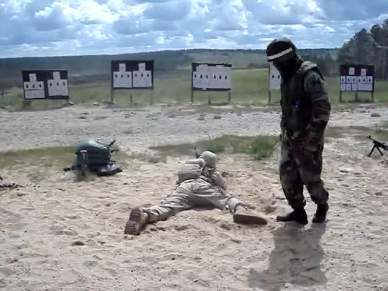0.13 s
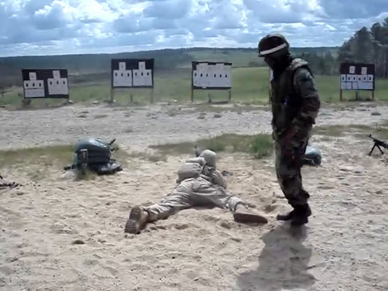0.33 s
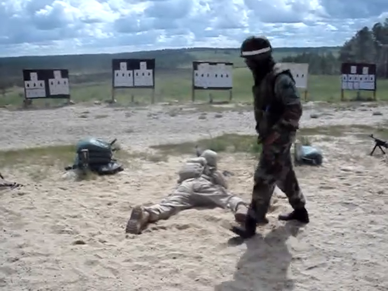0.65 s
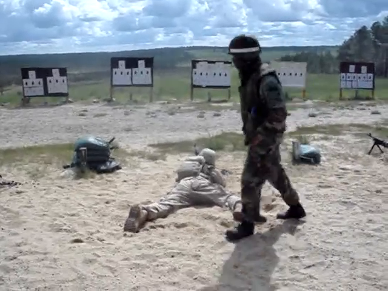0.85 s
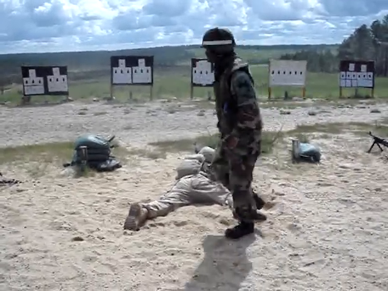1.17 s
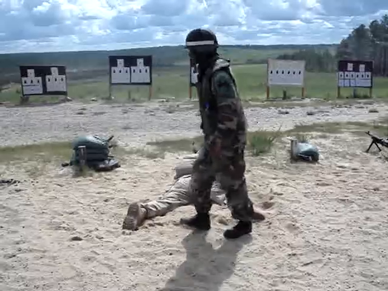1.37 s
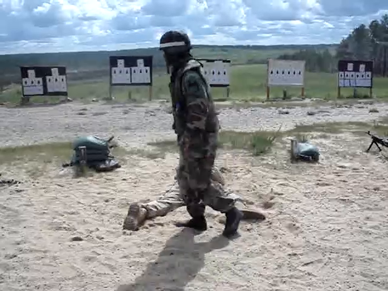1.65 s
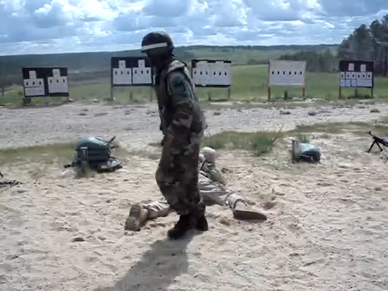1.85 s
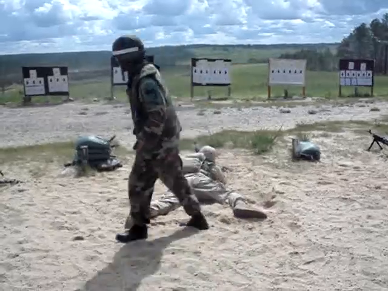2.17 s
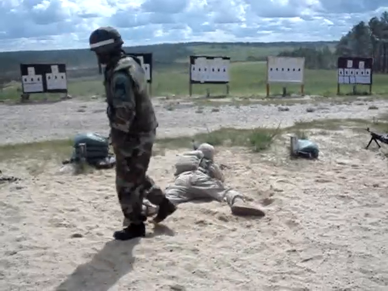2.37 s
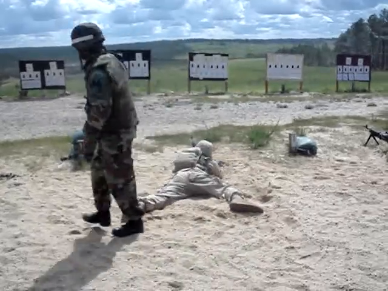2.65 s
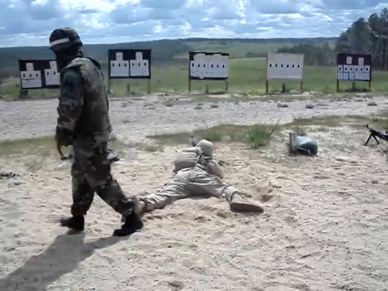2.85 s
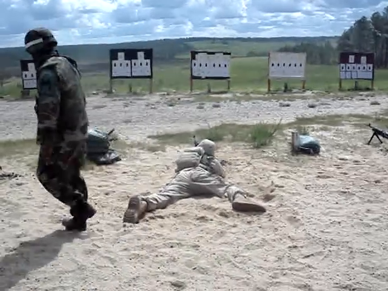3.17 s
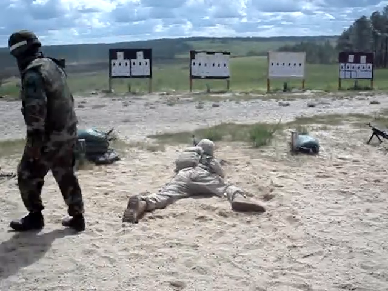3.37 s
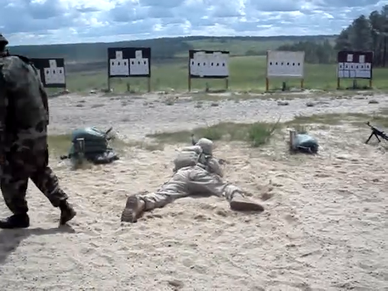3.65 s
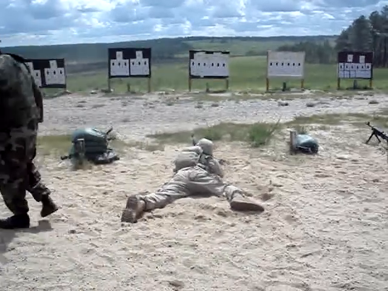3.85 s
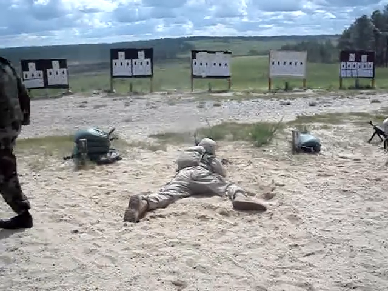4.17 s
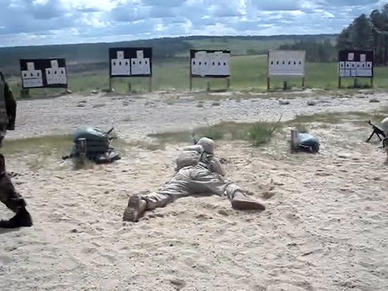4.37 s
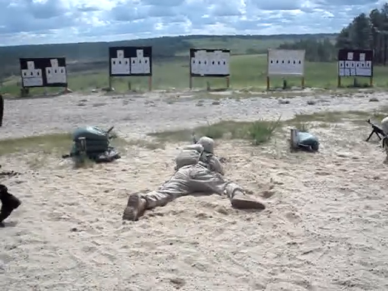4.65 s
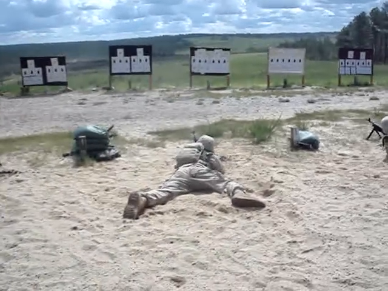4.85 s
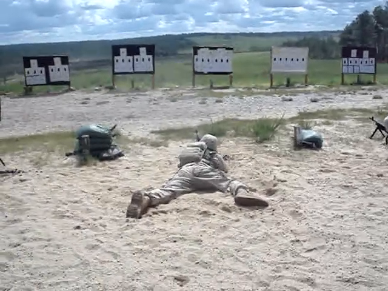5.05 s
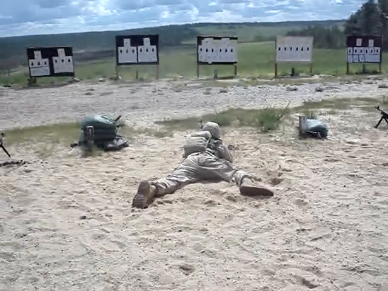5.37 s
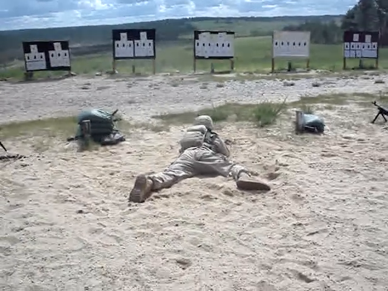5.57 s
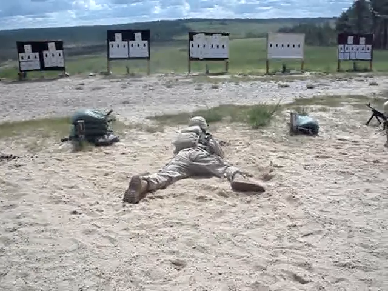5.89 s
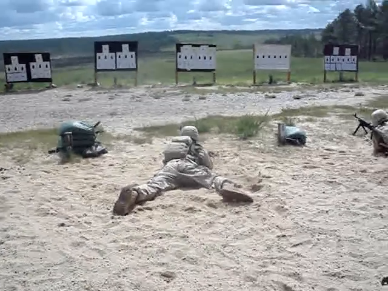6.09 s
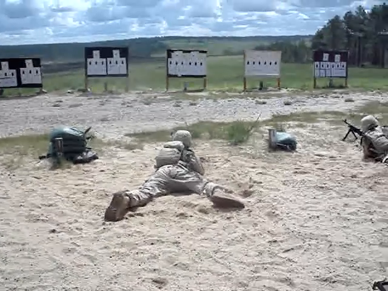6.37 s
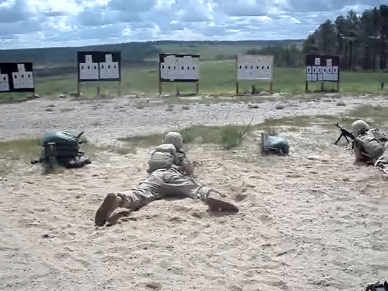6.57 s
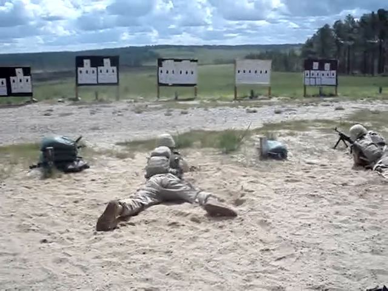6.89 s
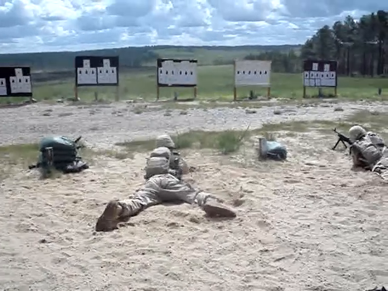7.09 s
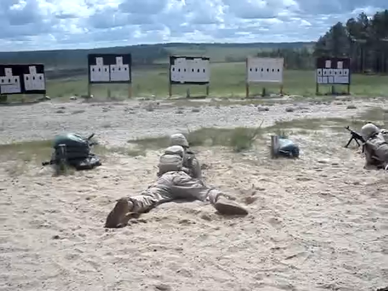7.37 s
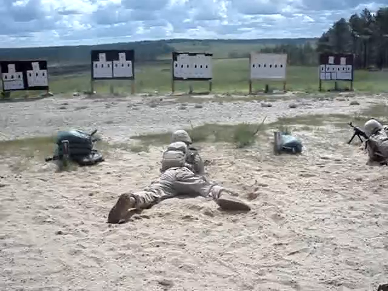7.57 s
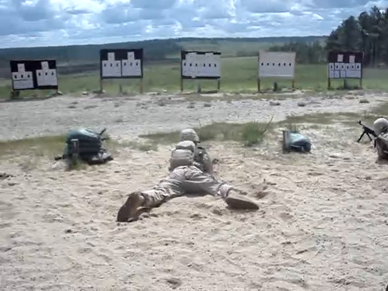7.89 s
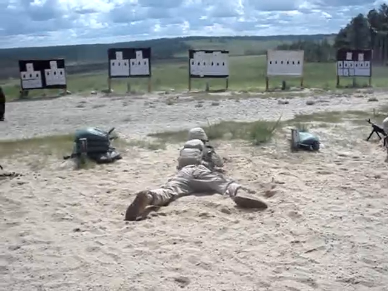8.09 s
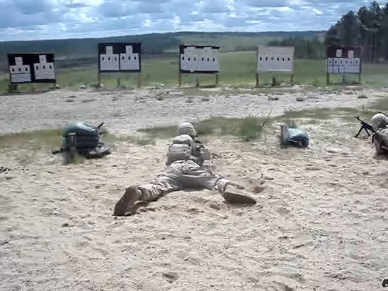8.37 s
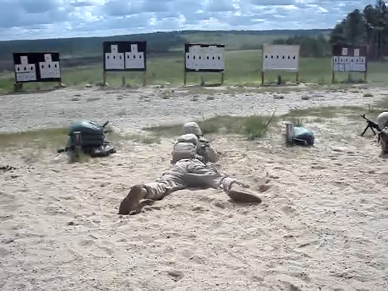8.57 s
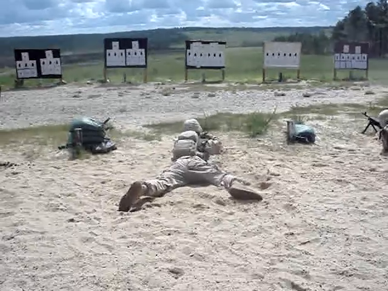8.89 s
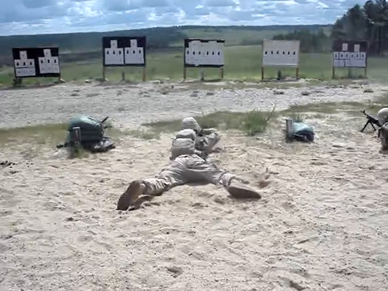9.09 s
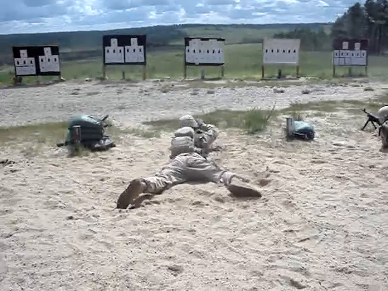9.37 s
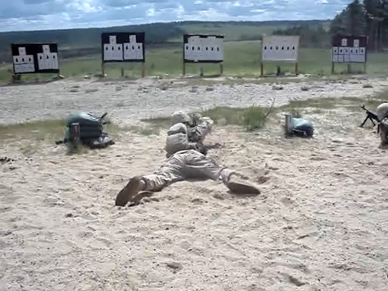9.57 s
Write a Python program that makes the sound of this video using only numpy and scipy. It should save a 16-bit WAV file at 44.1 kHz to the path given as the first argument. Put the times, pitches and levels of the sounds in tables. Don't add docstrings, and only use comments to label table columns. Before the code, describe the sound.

Machine guns rattle in short overlapping bursts on an open range, hollow claps returning from target boards, hills rumbling through the pauses.

```python
import sys
import numpy as np
from scipy import signal
from scipy.fft import rfft, irfft, next_fast_len
from scipy.io import wavfile
from scipy.ndimage import minimum_filter1d, map_coordinates

SR = 44100
rng = np.random.default_rng(int(sys.argv[2]) if len(sys.argv) > 2 else 0)


def master_out(mix):
    frames = np.transpose(np.atleast_2d(mix))
    ceiling = np.clip(frames, -1, 1)
    pcm = np.round(ceiling * 32767).astype(np.int16)
    wavfile.write(sys.argv[1], SR, pcm)


def undo_db(level):
    steps = np.asarray(level, float) / 20
    return 10 ** steps


N = 429527
LEAD, SPAN = 40, 1400


def along(points, hz):
    f, v = np.transpose(points)
    return np.interp(np.log(hz + 1), np.log(f + 1), v)


def coloured(shape, spectrum):
    m = next_fast_len(shape[-1])
    gain = undo_db(along(spectrum, np.fft.rfftfreq(m, 1 / SR)))
    x = irfft(rfft(rng.standard_normal(shape), m) * gain, m)[..., :shape[-1]]
    return x / np.sqrt(np.mean(x ** 2))


# (frequency [Hz], level [dB])
HILL_SPECTRUM = [(15, -61), (25, -8), (59, -44.5), (189, -12.5), (318, -3.5), (438, -6), (485, -8),
                 (616, -4.5), (1240, -3), (3000, -10), (3900, -52), (6600, -120)]
# (frequency [Hz], level [dB])
HISS_SPECTRUM = [(1760, -17.5), (3000, -19.5), (3250, -4), (4540, -6.5), (6510, -16.5), (10100, -27),
                 (13100, -51), (22000, -120)]
# (time [s], level [dB])
RUMBLE_LEVEL = [(0, -43.5), (.76, -43), (1.3, -43.5), (1.76, -37.5), (2.17, -42), (2.44, -44), (3, -37.5),
                (3.7, -40.5), (4.04, -35.5), (4.8, -41.5), (5.6, -41.5), (6.1, -46.5), (6.3, -37),
                (7.1, -49.5), (7.67, -43.5), (8.1, -41.5), (9.15, -42.5), (9.74, -35)]


def hills():
    t = np.arange(N) / SR
    body_db = np.interp(t, *np.transpose(RUMBLE_LEVEL))
    fired = np.sort([0] + [s for gun in ROUNDS.values() for s, _ in gun])
    rest = t - fired[np.searchsorted(fired, t, "right") - 1]
    hiss_db = -45.5 + 0.63 * (body_db + 38) - 6.5 * rest

    swell_db, peak_s = 5.5, 0.71
    swell_db = swell_db * rest / peak_s * np.exp(1 - rest / peak_s)
    body_db = body_db + swell_db
    hiss_db = hiss_db + 0.9 * swell_db

    lumps = map_coordinates(rng.standard_normal((2, 400)), [[[0], [1]] + 0 * t, [t * 28, t * 28]], order=1)
    body = undo_db(body_db + lumps[0]) * coloured((N,), HILL_SPECTRUM)
    hiss = undo_db(hiss_db + lumps[0] + lumps[1]) * coloured((N,), HISS_SPECTRUM)
    return body + hiss


WASH_LEVEL = {"near right": -46, "far right": -35, "middle": -39, "slow": -38, "quick": -33.5, "steady":
              -37, "shielded": -51, "bright": -27.5, "far left": -33, "left": -34, "late": -31, "nearest":
              -31}


def wash():
    follows, t60, ragged_db = 1.8, 0.3, 4
    power, t = np.zeros(N), np.arange(SR // 4) / SR
    for gun, db in WASH_LEVEL.items():
        s, strength_db = np.transpose(ROUNDS[gun])
        power[(s * SR).astype(int)] += undo_db(db + follows * strength_db) ** 2
    decay = undo_db(-60 * t / t60) ** 2
    level = np.sqrt(np.abs(signal.fftconvolve(power, decay)[:N]))
    grit = map_coordinates(rng.standard_normal(4000), [np.arange(N) * 400 / SR], order=1)
    return level * undo_db(ragged_db * grit) * coloured((N,), SAND_SPECTRUM)


# (frequency [Hz], reverberation time T60 [s])
FIELD_T60 = [(100, 0.3), (500, 0.33), (2000, 0.15), (5000, 0.11), (10000, 0.15)]


def field(x):
    hz, t, z = signal.stft(rng.standard_normal(SR // 4), SR, nperseg=256)
    fade = undo_db(-60 * t / along(FIELD_T60, hz)[:, None])
    tail = signal.istft(z * fade, SR, nperseg=256)[1]
    return signal.fftconvolve(x, tail / np.linalg.norm(tail))[:N]


# (time [s], level [dB])
CASE_BOUNCES = [
    (9.03, -33.5),
    (9.036, -44),
    (9.05, -48),
    (9.059, -47),
]
# (frequency [Hz], level [dB], decay time T60 [s])
BRASS_MODES = [(3811, -4, .3), (6422, -16, .12), (7332, -2, .25), (8096, -14, .08), (9109, -11, .12)]


def case():
    out, t = np.zeros(N), np.arange(SR // 4) / SR
    for s, db in CASE_BOUNCES:
        drift = 0.05 * np.cumsum(rng.standard_normal(len(t)))
        ring = 0
        for hz, level, t60 in BRASS_MODES:
            fade = undo_db(level + rng.normal(0, 2.5) - 60 * t / t60)
            ring = ring + fade * np.sin(2 * np.pi * hz * t + drift)
        tick = 0.67 * undo_db(-60 * t / 0.066) * np.diff(rng.standard_normal(len(t) + 1))
        out[round(s * SR):][:len(t)] += undo_db(db) * (ring + tick)
    return out


HEAVE_LEVEL = {"far right": -46, "quick": -43, "steady": -35, "bright": -36, "far left": -38, "late": -45,
               "nearest": -39}


def heave():
    blows, t = np.zeros(N), np.arange(SR // 10) / SR
    for gun, db in HEAVE_LEVEL.items():
        s, strength_db = np.transpose(ROUNDS[gun])
        blows[(s * SR).astype(int)] += undo_db(db + strength_db)
    swing = -np.sin(2 * np.pi * 88.5 * t) * undo_db(-60 * t / 0.03)
    return signal.fftconvolve(blows, swing)[:N]


def clock(times):
    return (np.arange(SPAN) - LEAD - (times * SR % 1)[:, None]) / SR


def placed(times, rows):
    at = (times * SR).astype(int)[:, None] + np.arange(SPAN)
    return np.bincount(at.ravel(), rows.ravel(), N + 2 * SPAN)[LEAD:LEAD + N]


# (from time [s], thump [Hz], board row [ms], posts [dB], scatter [dB])
FIRING_LANES = [
    (0, 275, 2.3, -11, -1.5),
    (.5, 318, 3.55, -15.5, -0.5),
    (1.3, 308, 3.7, -9, 1),
    (2.6, 368, 3.3, -20, 0.5),
    (3.7, 341, 3.6, -3.5, 2),
    (4.4, 325, 3.6, -12, 1.5),
    (6, 311, 3.9, -6, 2),
    (7.9, 346, 4.7, -10, 1.5),
    (9, 278, 3, -10, 2),
]


def lane(times):
    rows = np.array(FIRING_LANES)
    return rows[np.searchsorted(rows[:, 0], times) - 1, 1:].T[..., None]


FIRST_GUNS = { "near right": [(.0169, -2), (.1241, 1), (.2317, 0), (.3379, 0), (.4442, 0), (.5493, -1),
              (.6521, -1)], "far right": [(.5122, 0), (.6224, 0), (.7342, -1), (.8425, 0), (.9483, 0),
              (1.0553, 0)], "middle": [(1.4029, -2), (1.5164, 0), (1.6273, -3), (3.2276, -2), (3.3431, -1),
              (3.4567, 0), (3.5694, 1)], "slow": [(1.6039, -1), (1.7339, 0), (1.8666, -2), (1.9988, -5),
              (2.7044, 0), (2.8359, 0), (2.9668, 0), (3.0973, 1), (3.2283, -2)], "quick": [(1.5971, -1),
              (1.7017, 0), (1.8049, 0), (1.908, 1), (2.0117, -1), (2.1156, -4)], "steady": [(1.8757, 0),
              (1.9877, 0), (2.0983, 0), (2.2096, 0), (2.3224, -1), (6.22, 1), (6.3295, 1), (6.445, 1),
              (6.5569, 1), (6.6671, 1), (6.7772, 0), (6.8886, -1), (6.9991, 0), (7.1099, -1), (7.2214, 0),
              (7.3322, 0), (7.444, -1), (7.5558, 0), (7.667, 0), (7.7789, 0)]}
LATER_GUNS = { "shielded": [(2.0627, 1), (2.1619, -1), (2.2656, 0), (2.3625, -2), (2.4619, 1)],
              "bright": [(3.7863, 3), (3.8902, 3), (3.9914, 0), (4.0908, -2), (4.1917, -3), (6.1266, 5),
              (6.2285, 3), (6.3278, 0), (6.4263, 0), (6.5271, -2), (6.6266, -2), (6.7266, -6)],
              "far left": [(3.902, 1), (4.0034, 1), (4.1063, 0), (4.2072, -1), (4.3087, 0)],
              "left": [(4.2547, -5), (4.3645, -6), (4.4683, -1), (4.575, 0), (4.6824, 0), (4.7897, 1)],
              "late": [(7.5251, 0), (7.6321, -4), (7.7378, -4), (7.841, -5), (7.9473, -1), (8.0515, 0)],
              "nearest": [(6.1375, -7), (9.1966, 2), (9.3048, 0), (9.4178, -1), (9.525, 0), (9.6297, -1)]}
ROUNDS = {**FIRST_GUNS, **LATER_GUNS}


def arrivals(paths, strays=()):
    crack_follows, uneven_db = 0.35, 0.75
    ways = [(gun, *way) for gun in paths for way in paths[gun]]
    rows = []
    for k, (gun, delay_ms, first_db, *rest_db) in enumerate(ways):
        for s, db in ROUNDS[gun]:
            rows.append((s + delay_ms / 1000, k, first_db + crack_follows * db, *np.add(rest_db, db)))
    for k, (s, *levels_db) in enumerate(strays):
        rows.append((s, len(ways) + k, *levels_db))
    rows = np.array(rows)
    levels = rows[:, 2:] + uneven_db * rng.standard_normal(rows[:, 2:].shape)
    return rows[:, 0], rows[:, 1].astype(int), *levels.T


def front(t, width, rebound):
    return rebound * np.exp(-((t - 1.9 * width) / width) ** 2) - np.exp(-(t / width) ** 2)


# (frequency [Hz], level [dB])
SAND_SPECTRUM = [(60, -42), (200, -3), (500, -0.5), (1100, -3), (2000, -3.5), (4000, -5.5), (7000, -11.5),
                 (10000, -21)]


def scatter(t, path, quick_t60, slow_t60, slow_db):
    age, same_ground = np.maximum(t, 0), 0.55
    fade = undo_db(-60 * age / quick_t60) + undo_db(slow_db - 60 * age / slow_t60)
    repeated = np.sqrt(same_ground) * coloured(t.shape, SAND_SPECTRUM)[path]
    fresh = np.sqrt(1 - same_ground) * coloured(t.shape, SAND_SPECTRUM)
    return (repeated + fresh) * fade * (t > .00015)


def cracks(t, path, db, rebound, ragged_db):
    sharp = undo_db(np.minimum(0.65 * (db + 8), 2))[:, None]
    ragged = undo_db(ragged_db) * scatter(t, path, .018, 0.041, slow_db=-18.5)
    return sharp * front(t, .000075, rebound) + ragged


POST_PATHS = {"near right": [(24.7, -11.5)], "middle": [(25.7, -11.5)], "nearest": [(21.2, -9)]}


def snaps():
    s, path, db = arrivals(POST_PATHS)
    t = clock(s)
    wiggle = front(t, width=.00006, rebound=1.0) - 0.56 * np.exp(-((t - .00027) / .00007) ** 2)
    ragged = undo_db(-12.0) * scatter(t, path, 0.022, 0.069, slow_db=-39)
    return placed(s, undo_db(db + 3)[:, None] * (wiggle + ragged))


BOARD_PATHS = {"near right": [(29.1, -8, -20)], "far right": [(44.1, -13.5, -9)],
               "middle": [(32.3, -19, -10.5)], "slow": [(35.85, -16.5, -10.5), (48.8, -32, -32)],
               "steady": [(43.04, -9.5, -15)], "far left": [(51.5, -17, -14)], "left": [(0, -6.5, -19.5),
               (43.34, -14.5, -10)], "late": [(43.4, -17.5, -12.5)], "nearest": [(28.76, -21, -15.5)]}
# (time [s], crack [dB], hollow [dB])
ODD_CLAPS = [
    (.4898, -14, -15),
    (3.9422, -14, -21),
    (4.0077, -13, -24),
    (4.2651, -19, -22),
    (6.1751, -9, -11),
    (6.4781, -13, -30),
]


def claps():
    s, path, crack_db, hollow_db = arrivals(BOARD_PATHS, ODD_CLAPS)
    t, (_, row_ms, posts_db, lane_db) = clock(s), lane(s)
    hz = 1040 * (1 + 0.0088 * rng.standard_normal((len(s), 1)))
    boards = np.sin(2 * np.pi * hz * t - .6)
    posts = undo_db(posts_db + 3.5) * np.sin(2 * np.pi * 1.503 * hz * t - .3)
    row_end = (t > 0) * np.exp(-(t * 1e3 / row_ms) ** 3)
    ragged = undo_db(lane_db - 11.5) * scatter(t, path, 0.035, 0.062, slow_db=-16.5)
    hollow = (boards + posts) * row_end + ragged
    crack = cracks(t, path, crack_db, rebound=0.57, ragged_db=lane_db - 15)
    return placed(s, undo_db(crack_db + 3.5)[:, None] * crack + undo_db(hollow_db - 0.5)[:, None] * hollow)


FRONT_PATHS = {"near right": [(0.002, -7.5, -21)], "far right": [(0, -7.5, -28), (15.7, -18.5, -34.5),
               (33.4, -14.5, -38)], "middle": [(0, -10, -12), (7.2, -19, -29), (52, -23, -21)],
               "slow": [(0, -9, -11), (15.75, -17, -27.5), (28.8, -11, -49), (52.3, -18.5, -23)],
               "quick": [(0, -9, -16.5), (38.5, -12.5, -18.5)], "steady": [(0, -11, -29),
               (11.37, -24.5, -35), (28.9, -21.5, -25), (35.23, -18, -38.5)], "shielded": [(0, -21, -18),
               (22.74, -9, -43)], "bright": [(0, -9, -25.5), (6.79, -18, -24), (34, -16, -38),
               (47.6, -15.5, -20)], "far left": [(0.0047, -10, -23.5)], "left": [(4.34, -22.5, -28),
               (34.1, -16, -45)], "late": [(0.0042, -9.5, -17.5)], "nearest": [(0, -11, -9),
               (7.3, -16.5, -21), (26.2, -16.5, -14.5), (49.5, -21, -20)]}
# (time [s], crack [dB], thump [dB])
ODD_FRONTS = [(.462, -9, -14), (.4856, -14, -45), (1.612, -14, -31), (1.833, -16, -44), (2.0356, -19, -20),
              (3.2928, -24, -28), (3.7999, -19, -20), (3.8382, -15, -32), (3.8582, -19, -40),
              (4.0218, -10, -19), (4.1246, -13, -23), (4.2268, -12, -25), (6.0745, -27, -50),
              (6.104, -20, -50), (6.1175, -14, -45), (6.1476, -15, -17), (6.1546, -13, -21),
              (6.1797, -17, -24), (6.1912, -19, -15), (6.1989, -15, -24), (6.2388, -17, -17),
              (6.2444, -18, -24), (6.2495, -10, -26), (6.3417, -20, -20), (6.359, -12, -19),
              (6.4356, -20, -25), (9.2325, -21, -24), (9.2397, -27, -27)]


def blasts():
    s, path, crack_db, thump_db = arrivals(FRONT_PATHS, ODD_FRONTS)
    t, (hz, _, _, lane_db) = clock(s), lane(s)
    swing = np.sin(2 * np.pi * hz * t) * np.exp(-((t * hz - .5) / 0.51) ** 2) * (t > 0)
    edge = undo_db(thump_db + 21.5)[:, None] * front(t, width=.00019, rebound=0.58)
    ragged = undo_db(lane_db - 6.0) * scatter(t, path, 0.023, 0.17, slow_db=-22.5)
    thump = edge + 0.99 * swing + ragged
    crack = cracks(t, path, crack_db, rebound=0.65, ragged_db=lane_db - 12.5)
    return placed(s, undo_db(crack_db + 5.5)[:, None] * crack + undo_db(thump_db - 4.0)[:, None] * thump)


def scene():
    guns = blasts() + snaps() + claps()
    return (guns + undo_db(-15.5) * field(guns) + heave() + wash() + hills() + case())[None]


def saturated(x):
    top = np.where(x > 0, .48, .74)
    return x / (1 + np.abs(x / top) ** 6) ** (1 / 6)


# (frequency [Hz], level [dB])
COARSE_STEP = [(300, -41), (1500, -35), (2500, -30.5), (4000, -30), (7000, -29.5), (10000, -36.5)]


def block_rounding(x):
    greed, uneven_db, top_hz = 1.5, 5.5, 10003
    hz, _, z = signal.stft(x, SR, "cosine", nperseg=512)
    level_db = 10 * np.log10(np.sum(np.abs(z) ** 2, 0) + 1e-12)
    loudest_db = -minimum_filter1d(-level_db, size=8, origin=-2)

    tiles = rng.standard_normal((33, len(level_db) // 2 + 1))
    tiles = np.repeat(np.repeat(tiles, 8, 0), 2, 1)[:len(hz), :len(level_db)]
    step_db = along(COARSE_STEP, hz)[:, None] + greed * (loudest_db + 20) + uneven_db * tiles
    step = undo_db(step_db - 20.5)
    z = step * (np.round(z.real / step) + 1j * np.round(z.imag / step))
    z = z * (hz < top_hz)[:, None]
    return signal.istft(z, SR, "cosine", nperseg=512)[1][:N]


def roll_off(x):
    return signal.sosfilt(signal.butter(12, 16500, fs=SR, output="sos"), x)


def record(dry):
    rounded = block_rounding(saturated(dry)[0])
    mix = np.maximum(rounded, -.705)[None]
    return roll_off(mix)


dry = scene()
out = record(dry)
master_out(out)
```